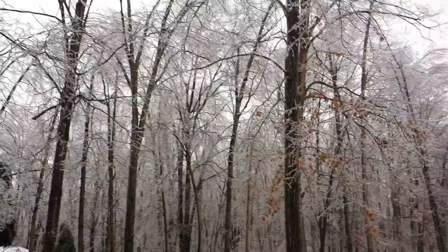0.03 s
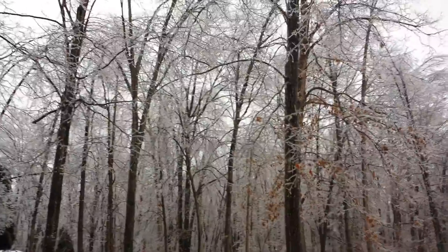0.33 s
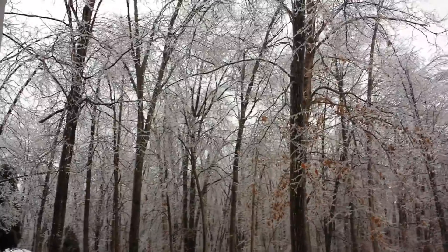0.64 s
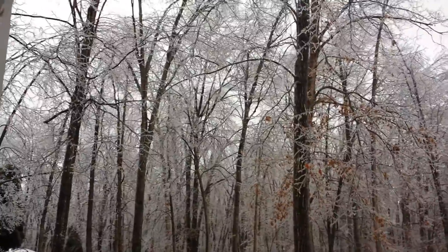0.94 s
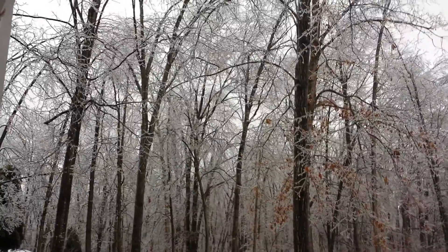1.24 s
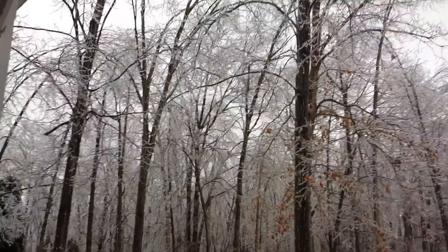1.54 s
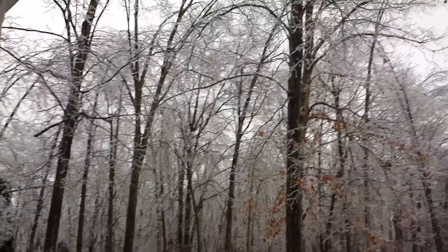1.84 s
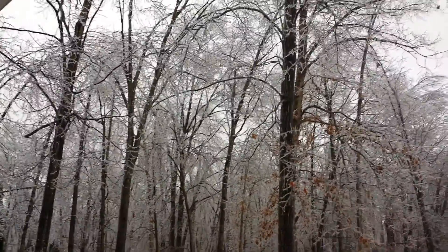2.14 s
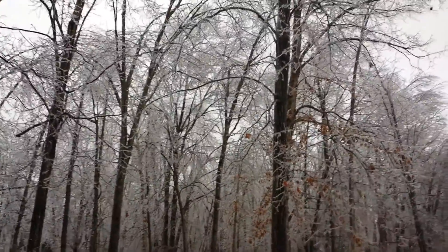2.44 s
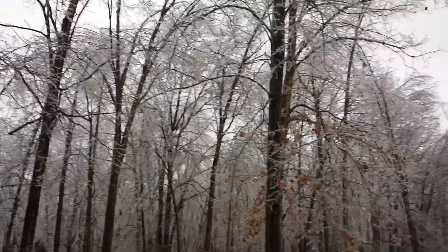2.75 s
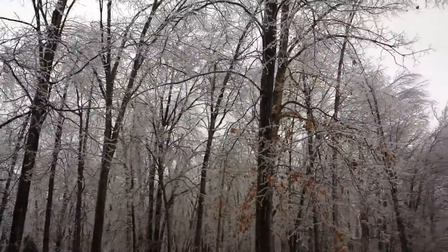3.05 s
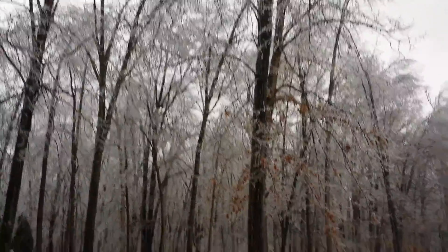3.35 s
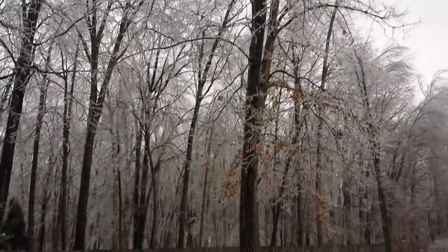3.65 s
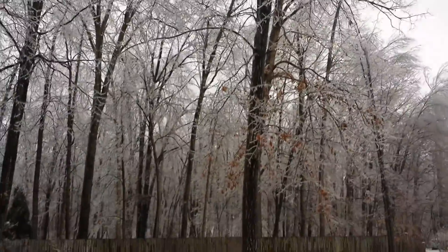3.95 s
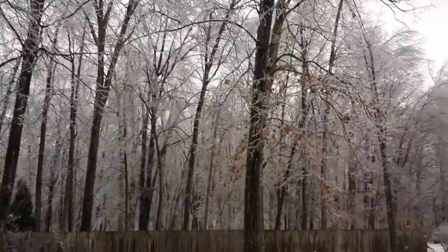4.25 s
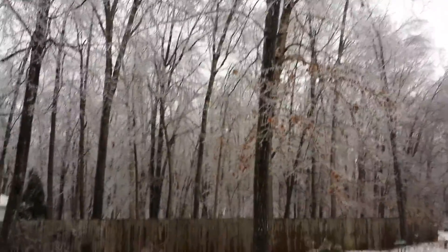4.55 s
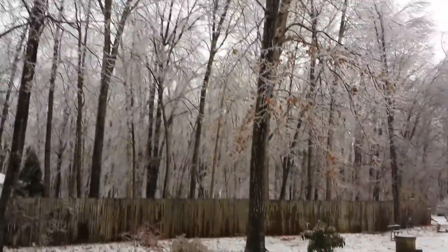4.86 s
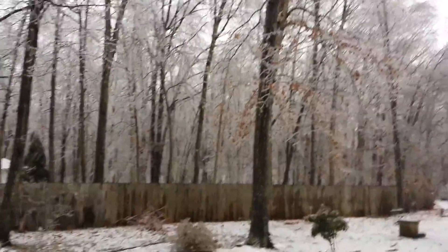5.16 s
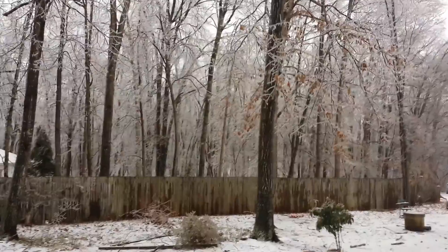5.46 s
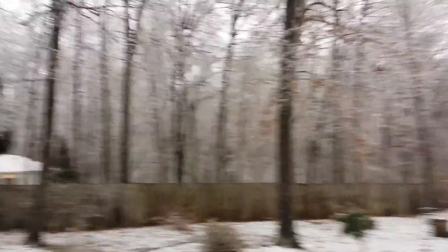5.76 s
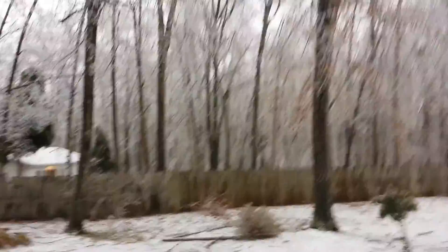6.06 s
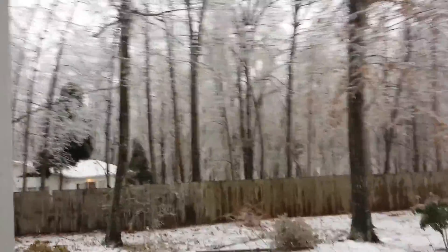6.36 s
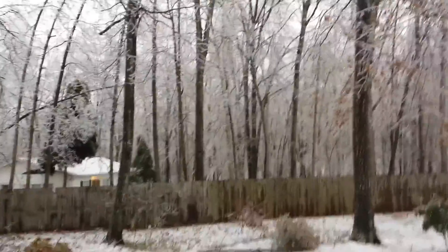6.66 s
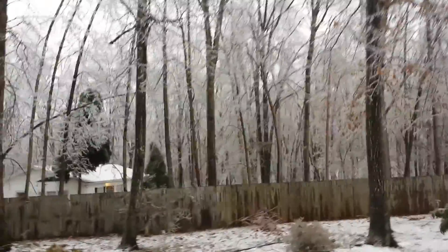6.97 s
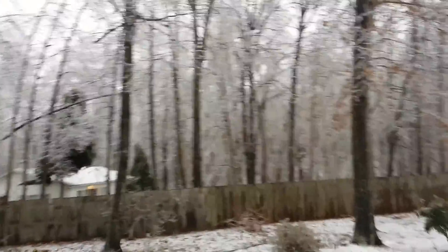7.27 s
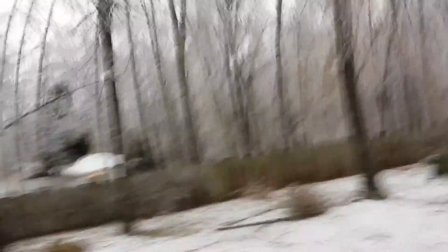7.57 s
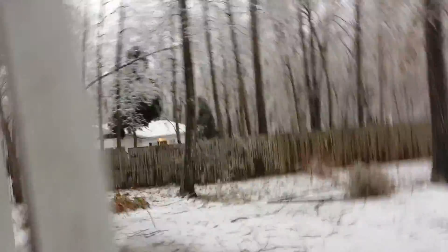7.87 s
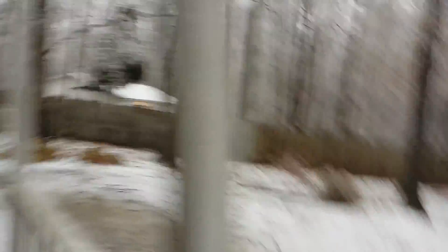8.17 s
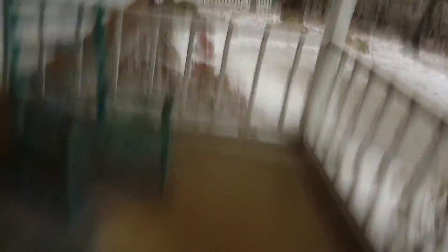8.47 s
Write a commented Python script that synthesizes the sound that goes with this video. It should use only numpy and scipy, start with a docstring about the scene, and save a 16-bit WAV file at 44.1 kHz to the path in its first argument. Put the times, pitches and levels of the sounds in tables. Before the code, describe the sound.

In a frozen wood, ice-coated twigs hiss softly over a faint low drone. Bits of ice trickle down and a strained trunk knocks now and then, with a few electrical pops on the left early on. Then limbs snap loudly and the tree crashes through its neighbours, showering ice and echoing among the trunks. At the end, low puffs of air buffet the microphone.

```python
"""An ice-laden tree gives way in a winter wood. At first glazed twigs hiss over a low drone, crusts of ice
trickle down and the strained trunk knocks, while the left microphone gives a few electrical pops.
From 5.4 s the limbs fracture one after another, each exciting a brief resonance of the wood. From about
6 s the crown crashes through its neighbours in a shower of ice, and the trunks scatter the sound back
as reverberation. In the last second turbulent air buffets the microphones as they swing away."""
import sys
import numpy as np
from scipy import signal
from scipy.fft import rfft, irfft, next_fast_len
from scipy.io import wavfile
from scipy.ndimage import map_coordinates

SR = 44100
rng = np.random.default_rng(int(sys.argv[2]) if len(sys.argv) > 2 else 0)


def wav_record(signal):
    """Record a signal, one row per channel, as 16-bit PCM in the file named by sys.argv[1]."""
    frames = np.transpose(np.atleast_2d(signal))
    bounded = np.clip(frames, -1, 1)
    # unit amplitude maps onto the largest positive 16-bit level
    quanta = np.round(bounded * 32767).astype(np.int16)
    wavfile.write(sys.argv[1], SR, quanta)


N = 381024
RIGHT_LEAD_S = 0.0002  # the tree's sound reaches the right microphone first
FADE_IN_AT_S, BAND_LIMIT_HZ = 0.425, 14850

# hiss of glazed twigs throughout the wood: (time [s], relative level [dB])
HISS_LEVELS = [(0.5, -46), (0.6, -42.5), (1.46, -42.5), (1.53, -48), (1.73, -42.5), (1.98, -46),
               (2.9, -42.5), (3.9, -42), (5.35, -43)]
# spectrum of that hiss: (frequency [Hz], relative density [dB])
HISS_SPECTRUM = [(100, -22), (250, 2), (500, -0.5), (900, 1.5), (2500, 2.5), (5000, 1.5), (9000, 1),
                 (15000, -2)]
# distant low drone: (time [s], relative level [dB])
DRONE_LEVELS = [(0.5, -47.5), (1.0, -43), (1.6, -48), (2.3, -48), (3.0, -42.5), (4.4, -43), (4.7, -42.5),
                (7.1, -42.5), (7.5, -46.5)]
# spectrum of that drone: (frequency [Hz], relative density [dB])
DRONE_SPECTRUM = [(20, -32), (42, -25), (58, -3), (76, -12.5), (100, -0.5), (125, 0.5), (150, -9),
                  (200, -13), (300, -15.5), (600, -20), (1500, -60)]
# puffs of air on the swinging microphones: (time [s], level [dB], t60 [s])
AIR_PUFFS = [(7.89, -43, .3), (8.225, -37.5, .25), (8.29, -22, 0.37), (8.425, -22, 0.24),
             (8.465, -26, 0.14), (8.525, -27, .2), (8.607, -20, 0.23)]
# spectrum of their turbulence: (frequency [Hz], relative density [dB])
TURBULENCE_SPECTRUM = [(20, -25), (60, 0), (110, 6), (200, 3), (290, -7.5), (450, -24), (2000, -81)]
# crusts of ice sliding off twigs: (time [s], level [dB], pitch [Hz])
ICE_TRICKLES = [(0.676, -37, 6640), (1.797, -39.5, 6000), (2.95, -37, 7500), (3.3, -39, 7500),
                (3.635, -42, 6500), (3.894, -32, 7900), (4.085, -38, 8000), (4.337, -39, 6500),
                (4.635, -39, 7500), (4.79, -39, 6500), (5.16, -38, 9050)]
# knocks of the strained trunk: (time [s], relative level [dB], gain of upper modes and rasp [dB])
TRUNK_KNOCKS = [(0.662, -33, -2), (1.208, -31, 3.5), (1.438, -34, 2), (1.782, -29.5, 2.5),
                (2.318, -34.5, 0.5), (2.864, -34.5, 4.5), (3.182, -30, 4), (3.381, -26.5, -3),
                (3.498, -33, -4), (4.299, -40, 13), (5.009, -29.5, -3), (5.169, -30.5, 4.5)]
# normal modes of the trunk: (frequency [Hz], relative level [dB], t60 [s], rise time [s])
TRUNK_MODES = [(397, -1, 0.072, 0.0088), (622, -7.5, 0.07, 0.0015), (974, -17, 0.038, 0.00046)]
# the largest pieces of ice cracking: (time [s], relative level [dB], pitch [Hz])
ICE_CRACKS = [(3.8924, -15, 7200), (6.47, -16, 7050), (6.5335, -23, 6110), (6.612, -11, 5660),
              (6.778, -7.5, 4020), (6.824, -6, 4080), (6.939, -16, 3180), (6.999, -2.5, 5740),
              (7.329, -7, 6670), (7.3547, -3, 5550), (7.4048, -5, 4800), (7.436, -6.5, 6400),
              (7.490, -10, 7600), (7.516, -3, 4670), (7.614, -7, 5090), (7.6802, -4.5, 5960),
              (7.762, -5.5, 5600), (7.7948, -8, 6230), (8.101, -9, 3100), (8.576, -13, 5500)]
# main fractures of whole limbs: (time [s], level [dB], pitch [Hz], t60 [s])
LIMB_FRACTURES = [(5.4112, -17, 490, .035), (5.4203, -13.5, 460, 0.036), (5.435, -12.5, 330, 0.031),
                  (5.468, -17, 434, 0.028), (5.824, -22, 620, 0.026), (5.831, -17, 735, 0.064),
                  (6.464, -30.5, 607, 0.067), (6.621, -17.5, 260, 0.031), (6.607, -21.5, 1080, 0.061),
                  (6.652, -21, 536, 0.043), (7.32, -24, 827, 0.043), (7.974, -17, 760, 0.043),
                  (8.105, -21, 554, 0.047)]
# limbs breaking and striking:
# (time [s], wood level [dB], pitch [Hz], t60 [s], thud level [dB], twig level [dB], ice level [dB])
LIMB_BREAKS = [(5.413, -27, 700, 0.38, -23, -31, -25.5), (5.831, -26.5, 700, 0.4, -37, -24, -26),
               (6.404, -39, 1140, 0.31, -54, -46, -48), (6.462, -36, 620, 0.24, -41, -45, -31.5),
               (6.603, -23, 1110, 0.34, -25.5, -27, -26), (6.82, -27.5, 900, 0.11, -48, -40, -41),
               (6.868, -26.5, 725, 0.24, -46, -27, -34), (6.938, -25.5, 850, 0.22, -35.5, -27.5, -28),
               (7.005, -33, 1110, 0.37, -42, -24, -27), (7.139, -33, 1450, 0.13, -50, -33, -38),
               (7.319, -22.5, 810, 0.13, -40, -31, -23), (7.406, -23.5, 1070, 0.14, -40, -32, -34),
               (7.52, -30, 794, 0.38, -53, -34, -24.5), (7.668, -29, 750, 0.23, -49, -39, -31),
               (7.722, -28, 850, 0.22, -32, -40, -35), (7.763, -30, 770, 0.23, -41, -30, -36),
               (7.866, -31, 624, 0.1, -44, -44, -32.5), (7.964, -22, 700, 0.32, -35.5, -25, -28),
               (7.988, -27, 1260, 0.26, -44, -20, -27.5), (8.098, -29, 1000, 0.24, -47, -23, -30),
               (8.431, -24.5, 1190, 0.45, -39, -28.5, -36), (8.525, -28, 1250, 0.11, -28, -34, -32),
               (8.621, -22.5, 900, 0.23, -47, -35, -27)]
# the ice coat bursts more abruptly as the tree gathers speed: (time [s], rise time [s])
SPRAY_RISE_TIMES = [(5.4, 0.021), (5.83, 0.017), (6.46, 0.0066), (7.3, 0.0035)]
# dull thud of a heavy limb: (frequency [Hz], relative density [dB])
THUD_SPECTRUM = [(30, -25), (70, -7), (140, -6.5), (225, 0), (340, -2.5), (480, -3.5), (1000, -29)]
# thin twigs snapping: (frequency [Hz], relative density [dB])
TWIG_SPECTRUM = [(300, -16), (1100, -5.5), (1600, 1.5), (2600, -3), (9000, -23)]
# shattering ice: (frequency [Hz], relative density [dB])
ICE_SPECTRUM = [(400, -19), (1200, 1), (2400, -1), (3800, 4), (5000, 1), (6500, 0), (8000, -2),
                (10000, -4.5), (12000, -7.5), (15000, -16)]
# colliding boughs: (frequency [Hz], relative density [dB])
BOUGH_SPECTRUM = [(30, -40), (70, -36), (150, -5), (280, -6.5), (450, 2.5), (600, 2.5), (800, 3.5),
                  (1200, 3.5), (2000, -2.5), (3200, -32), (8000, -45)]
# the crown striking its neighbours: (time [s], relative branch level [dB], relative ice level [dB])
CROWN_LEVELS = [(6.2, -41, -31.5), (6.46, -40, -31), (6.61, -30.5, -32.5), (6.8, -38, -29.5),
                (7.04, -28.5, -26.5), (7.14, -28, -24), (7.3, -29, -25), (7.41, -27.5, -23.5),
                (7.57, -27.5, -23.5), (7.8, -29.5, -27.5), (7.94, -32, -31), (8.17, -28, -27.5),
                (8.37, -37, -26.5), (8.54, -32.5, -24), (8.64, -34.5, -26.5)]
# the thin tips of the crown come down last: (time [s], twig level against boughs [dB])
TWIG_BALANCE = [(7.0, -1.5), (7.6, -5.5), (8.4, 5.5)]
# brief dips in level just before loud hits: (time [s], depth [dB], half-width [s])
LEVEL_DIPS = [(6.993, 5, 0.005), (7.311, 3.5, 0.01), (7.941, 1.5, 0.023)]
# reverberation among the trunks: (frequency [Hz], t60 [s])
REVERBERATION_TIMES = [(100, 1.1), (450, 1.83), (2000, 1.36), (6000, 1.53), (14000, 0.59)]
# likeness of diffuse sound at the two microphones: (frequency [Hz], coherence [ratio])
COHERENCE = [(130, 0.94), (350, 0.92), (700, 0.42), (1200, 0.06), (2200, 0.065), (6000, 0.024)]
# tone of the left channel, a peak near 6 kHz and the top treble cut off: (frequency [Hz], gain [dB])
LEFT_TONE = [(3000, 1.5), (4200, 3.5), (5000, 7), (6100, 12), (7000, 8.5), (8000, 1.5), (10000, -1.5),
             (12000, -10.5), (14500, -51)]
# tone of the right channel: (frequency [Hz], gain [dB])
RIGHT_TONE = [(3000, 2), (4600, 2), (5900, 1.5), (7000, 1.5), (8000, 4.5), (10000, 2.5), (12000, 2.5),
              (14500, -3.5)]
# voltage jumps in the left channel: (time [s], step level [dB])
VOLTAGE_STEPS = [(0.6525, -5.5), (0.834, -4), (0.9551, -6), (1.523, 0.5), (5.8769, -4.5), (6.627, -23)]


def amp(db):
    """Amplitude ratio of a level in decibels."""
    return 10 ** (np.asarray(db) / 20)


def unit_rms(x):
    """Normalisation to unit mean power."""
    return x / np.sqrt(np.mean(x ** 2) + 1e-20)


def at_frequency(points, hz):
    """Interpolation of (frequency, value) points on a logarithmic frequency axis."""
    frequencies, values = np.transpose(points)
    return np.interp(np.log(hz + 1), np.log(frequencies + 1), values)


def time_curves(rows):
    """Linear interpolation of each column after the time, one value per sample."""
    times, *columns = np.transpose(rows)
    return [np.interp(np.arange(N) / SR, times, column) for column in columns]


def wobble(rate):
    """Smooth random modulation: a spline through `rate` Gaussian values a second."""
    knots = rng.standard_normal(int(N * rate / SR) + 4)
    return map_coordinates(knots, [np.arange(N) * rate / SR])


def filtered(x, response):
    """Linear filtering: the spectrum is multiplied by a complex frequency response."""
    n = x.shape[-1]
    padded = next_fast_len(n + SR // 4)
    return irfft(rfft(x, padded) * response(np.fft.rfftfreq(padded, 1 / SR)), padded)[..., :n]


def coloured(x, spectrum):
    """Spectral shaping by (frequency [Hz], gain [dB]) points, at unit rms."""
    return unit_rms(filtered(x, lambda hz: amp(at_frequency(spectrum, hz))))


def resonant(x, centre_hz, width):
    """Response of a damped resonator of relative bandwidth `width` (1/Q), at unit rms."""
    def band_pass(hz):
        loss = 1j * hz * width * centre_hz
        return loss / (centre_hz ** 2 - hz * hz + loss)
    return unit_rms(filtered(x, band_pass))


def add(track, onset, sound):
    """Superposition of a sound on a track, from an onset in seconds."""
    part = track[:, round(onset * SR):][:, :sound.shape[-1]]
    part += sound[..., :part.shape[1]]


def diffuse_noise(n, lead_s=0):
    """A diffuse field at spaced microphones: coherent in the bass, the right one ahead by lead_s."""
    def mid_side_gains(hz):
        angle = np.arccos(np.clip(at_frequency(COHERENCE, hz), -1, 1)) / 2
        return np.array([np.cos(angle), np.sin(angle)])
    mid, side = filtered(rng.standard_normal((2, n)), mid_side_gains)
    pair = np.array([mid + side, mid - side])
    return filtered(pair, lambda hz: np.exp(1j * np.pi * hz * lead_s * np.array([[-1], [1]])))


def snaps(n, rate, spread_db):
    """A Poisson train of uneven fracture impulses; each bearing sets a delay between the channels."""
    chance, size, sign, bearing = rng.random(n), *rng.standard_normal((3, n))
    at = np.flatnonzero(chance < rate / SR)
    impulses = np.sign(sign[at]) * amp(spread_db * np.minimum(size[at], 2))
    lag = np.round(RIGHT_LEAD_S * SR * (1 + .6 * bearing[at])).astype(int)
    left = np.bincount((at + lag) % n, impulses, n)
    return unit_rms(np.array([left, np.bincount(at, impulses, n)]))


def shards(rate, pitch_hz, cycles, spread_db):
    """Free vibration of falling pieces: each rings at a pitch set by its size, down to 1/e in `cycles`."""
    when, pitch, strength, side, bearing = rng.random((int(rate * N / SR), 5)).T[..., None]
    t = np.arange(int(2 * np.pi * cycles / pitch_hz * SR)) / SR
    hz = np.minimum(pitch_hz * 2 ** (2 * pitch - 1), BAND_LIMIT_HZ)
    gain = amp(spread_db * np.minimum(-np.log(1 - strength), 4))
    ring = gain * np.sin(2 * np.pi * hz * t) * np.exp(-hz * t / cycles)
    at = (when * N).astype(int) + np.arange(len(t))
    lag = (2 * RIGHT_LEAD_S * SR * bearing).astype(int)
    pan = side - .5
    channels = [(at + lag, ring * (1 + pan)), (at, ring * (1 - pan))]
    return unit_rms(np.array([np.bincount(i.ravel(), wave.ravel(), N)[:N] for i, wave in channels]))


def swell(t, rise, t60):
    """Envelope of a damped transient, peak 1: a smooth onset, then exponential decay."""
    shape = (1 - np.exp(-(t / rise) ** 2)) * amp(-60 * t / t60)
    return shape / shape.max()


def woodland():
    """Incoherent summation: countless far twigs merge to a hiss, with nearer ticks and a low drone."""
    hiss_db, = time_curves(HISS_LEVELS)
    drone_db, = time_curves(DRONE_LEVELS)
    ticks = shards(rate=900, pitch_hz=6470, cycles=1.8, spread_db=2.0)
    hiss_gain = amp(hiss_db + 4.5 + 0.75 * wobble(13))
    hiss = coloured(diffuse_noise(N), HISS_SPECTRUM) + amp(-9.5) * ticks
    drone_gain = amp(drone_db - 1.3 + 0.56 * wobble(3.2))
    drone = coloured(diffuse_noise(N, lead_s=-0.00021), DRONE_SPECTRUM)
    return hiss_gain * hiss + drone_gain * drone


def air_buffets():
    """Turbulent pressure: each swing drives a low puff of air at the microphone ports, mostly the left."""
    flow, t = np.zeros((1, N)), np.arange(SR // 2) / SR
    for onset, db, t60 in AIR_PUFFS:
        add(flow, onset, amp(db) * swell(t, rise=0.13 * t60, t60=t60))
    port_gains = flow * amp(0.97 * wobble(25)) * amp([[0], [-14]])
    return port_gains * coloured(rng.standard_normal((2, N)), TURBULENCE_SPECTRUM)


def reverberation(x, segments=16):
    """Multiple scattering among trunks, by new paths as the tree moves; the top treble decays first."""
    out, step = np.zeros((2, N)), N // segments + 1
    for start in range(0, N, step):
        hz, t, spectra = signal.stft(diffuse_noise(SR, RIGHT_LEAD_S), SR, nperseg=256)
        decay = amp(-60 * t / at_frequency(REVERBERATION_TIMES, hz)[:, None])
        build_up = 1 - np.exp(-t / 0.0069)
        tail = signal.istft(spectra * decay * build_up, SR, nperseg=256)[1]
        tail /= np.linalg.norm(tail[0])
        add(out, start / SR, signal.fftconvolve(x[:, start:start + step], tail, axes=1))
    return out


def ice_trickles():
    """Impact excitation: small crusts let go and patter through the twigs with a high resonance."""
    out, t = np.zeros((2, N)), np.arange(SR // 4) / SR
    for onset, db, pitch_hz in ICE_TRICKLES:
        patter = resonant(snaps(len(t), rate=2000, spread_db=4), pitch_hz, width=.45)
        add(out, onset, amp(db) * patter * swell(t, rise=0.0035, t60=0.18))
    return out


def trunk_knocks():
    """Stick-slip friction: fibres slip inside the trunk with a rasp and excite its hollow normal modes."""
    out, t = np.zeros((2, N)), np.arange(SR // 4) / SR
    for onset, db, upper_db in TRUNK_KNOCKS:
        detunings = 1 + rng.normal(0, 0.028, len(TRUNK_MODES))  # no two slips ring quite alike
        lowest, *upper = [amp(level) * swell(t, rise, t60) * np.sin(2 * np.pi * hz * detune * t)
                          for (hz, level, t60, rise), detune in zip(TRUNK_MODES, detunings)]
        rasp = resonant(diffuse_noise(len(t), RIGHT_LEAD_S), 380, width=4.3)
        rasp *= swell(t, rise=0.0016, t60=0.15)
        knock = lowest + amp(upper_db) * (sum(upper) + amp(-6.5) * rasp)
        add(out, onset - .007, amp(db - 4.0) * knock)
    return out


def ice_cracks():
    """Brittle fracture: thick ice cracks in a quick volley that excites a brief, bright resonance."""
    out, t = np.zeros((2, N)), np.arange(SR // 20) / SR
    for onset, db, pitch_hz in ICE_CRACKS:
        volley = resonant(snaps(len(t), rate=7000, spread_db=2), pitch_hz, width=.5)
        add(out, onset, amp(db - 15.5) * volley * swell(t, rise=0.00092, t60=0.036))
    return out


def limb_fractures():
    """Damped vibration: a fracture jolts the whole limb, lower for thicker wood, and torn fibres rasp."""
    out, t = np.zeros((2, N)), np.arange(SR // 4) / SR
    for onset, db, pitch_hz, t60 in LIMB_FRACTURES:
        tone = np.sin(2 * np.pi * pitch_hz * (t + np.array([[0], [RIGHT_LEAD_S]])))
        rasp = resonant(diffuse_noise(len(t), RIGHT_LEAD_S), pitch_hz, width=0.72)
        add(out, onset, amp(db) * (tone + amp(-8) * rasp) * swell(t, rise=0.044 * t60, t60=t60))
    return out


def limb_breaks():
    """Progressive fracture: a limb tears in snaps and thuds, takes twigs along and bursts its ice coat."""
    out, t = np.zeros((2, N)), np.arange(SR * 3 // 4) / SR
    for onset, wood_db, pitch_hz, t60, thud_db, twigs_db, ice_db in LIMB_BREAKS:
        ring = resonant(snaps(len(t), rate=1600, spread_db=2.5), pitch_hz, width=0.38)
        fibres = amp(wood_db) * coloured(ring, [(2000, -3.0), (9000, -23.0)])  # wet wood absorbs treble
        thud = amp(thud_db) * coloured(snaps(len(t), rate=1300, spread_db=0.5), THUD_SPECTRUM)
        twigs = amp(twigs_db) * coloured(snaps(len(t), rate=3400, spread_db=1.0), TWIG_SPECTRUM)
        spray = amp(ice_db) * coloured(snaps(len(t), rate=6000, spread_db=4.0), ICE_SPECTRUM)
        spray_rise = np.interp(onset, *np.transpose(SPRAY_RISE_TIMES))
        add(out, onset, (fibres + thud) * swell(t, rise=0.026 * t60, t60=t60))
        add(out, onset, twigs * swell(t, rise=0.37 * spray_rise, t60=t60))  # twigs snap ahead of the ice
        add(out, onset, spray * swell(t, rise=spray_rise, t60=0.65))
    return out


def falling_crown():
    """Superposed random impacts: boughs knock and twigs snap through other trees, whose ice pours down."""
    branch_db, ice_db = time_curves(CROWN_LEVELS)
    twigs_db, = time_curves(TWIG_BALANCE)
    loosened = np.clip((np.arange(N) / SR - 5.9) / 0.85, 0, 1)
    clumps_db = wobble(70)  # whole sprays of twigs strike at once
    knocking = shards(rate=330, pitch_hz=1000, cycles=4, spread_db=2.2)
    boughs = coloured(snaps(N, rate=1800, spread_db=1.5) + amp(-16.0) * knocking, BOUGH_SPECTRUM)
    twigs = coloured(snaps(N, rate=3000, spread_db=3.5), TWIG_SPECTRUM)
    branches = unit_rms(boughs + amp(twigs_db) * twigs)
    branches *= amp(branch_db + 0.5 + 0.32 * clumps_db + wobble(30))
    grit = coloured(snaps(N, rate=5500, spread_db=3.5), ICE_SPECTRUM)
    chips = coloured(shards(rate=1600, pitch_hz=4800, cycles=3.5, spread_db=3), ICE_SPECTRUM)
    ice = unit_rms(grit + .5 * chips) * amp(ice_db - 2.0 + clumps_db)
    return loosened * (branches + ice)


def dip_gain():
    """Amplitude modulation: the level dips briefly just before three loud hits."""
    t = np.arange(N) / SR
    dips_db = [depth * np.exp(-((t - centre) / width) ** 2) for centre, depth, width in LEVEL_DIPS]
    return amp(-sum(dips_db))


def scene():
    """Superposition of the tree's direct and reverberant sound, the trickles, the wood and the air."""
    knocks, breaks, fractures = trunk_knocks(), limb_breaks(), limb_fractures()
    fall = falling_crown() + ice_cracks()
    scattered = amp(-14.5) * knocks + amp(-14) * fractures + amp(-4.5) * breaks + amp(-10) * fall
    tree = knocks + breaks + fractures + fall + reverberation(scattered)
    return dip_gain() * tree + ice_trickles() + woodland() + air_buffets()


def electrical_pops(corner_hz, damping):
    """Step response of a high-pass input: each voltage jump is pulled back with one undershoot."""
    steps = np.zeros(N)
    for onset, db in VOLTAGE_STEPS:
        steps[round(onset * SR)] = amp(db)
    radians_per_sample = 2 * np.pi * corner_hz / SR
    poles = np.exp(radians_per_sample * np.roots([1, 2 * damping, 1]))
    jumps = signal.lfilter([1, -1], np.poly(poles).real, steps)
    return filtered(jumps, lambda hz: 1 / (1 + 1j * hz / 6000) ** 2)  # a low-pass rounds the edges


def record(dry):
    """Band-limited transmission: two channels of unlike tone fade in with faint noise; the left pops."""
    heard = filtered(dry, lambda hz: amp([at_frequency(LEFT_TONE, hz), at_frequency(RIGHT_TONE, hz)]))
    self_noise = amp(-56.0) * rng.standard_normal((2, N))
    fade_in = np.clip((np.arange(N) / SR - FADE_IN_AT_S) / 0.036, 0, 1)
    left_pops = np.outer([1, 0], electrical_pops(corner_hz=102, damping=0.57))
    voltage = fade_in * (heard + self_noise) + left_pops
    return filtered(voltage, lambda hz: 1 / (1 + (hz / BAND_LIMIT_HZ) ** 240))


dry = scene()
out = record(dry)
wav_record(out)
```